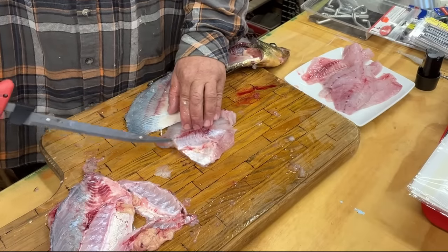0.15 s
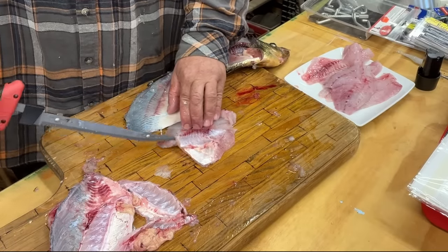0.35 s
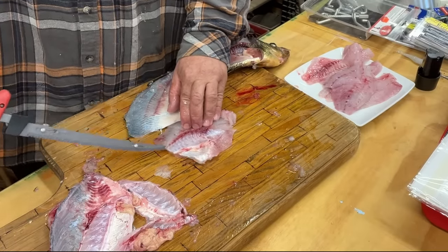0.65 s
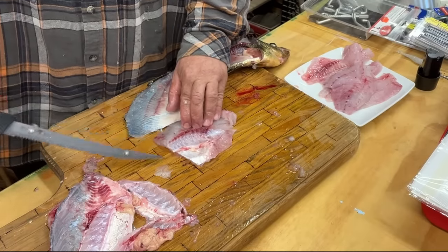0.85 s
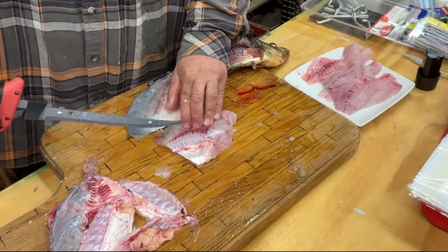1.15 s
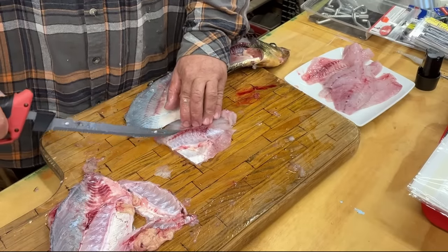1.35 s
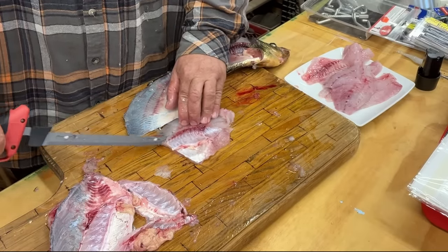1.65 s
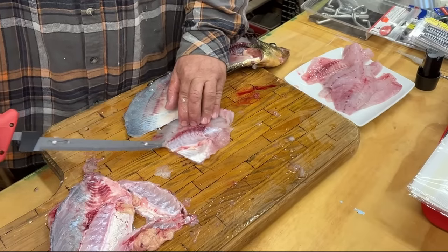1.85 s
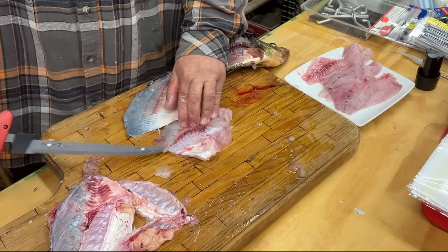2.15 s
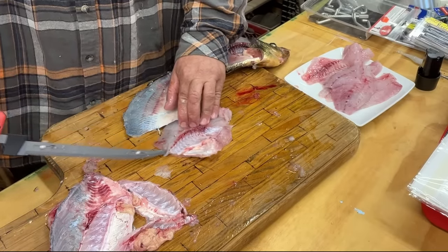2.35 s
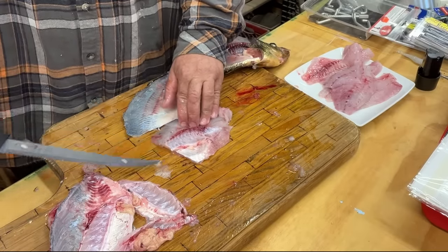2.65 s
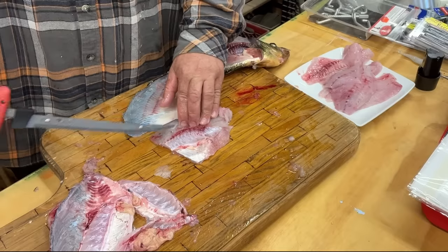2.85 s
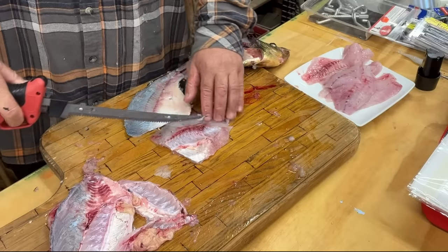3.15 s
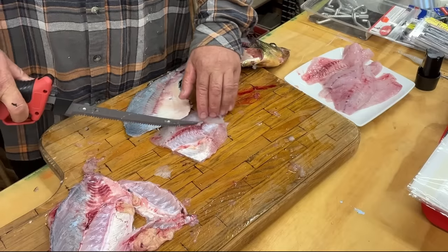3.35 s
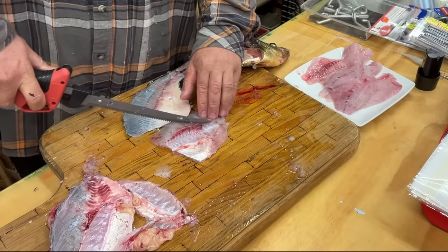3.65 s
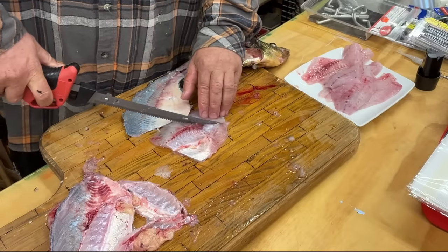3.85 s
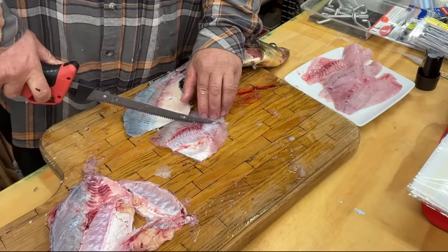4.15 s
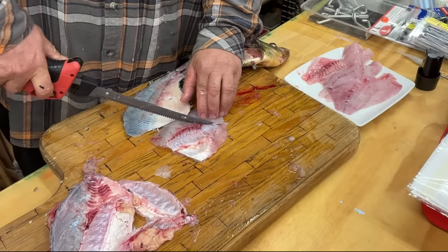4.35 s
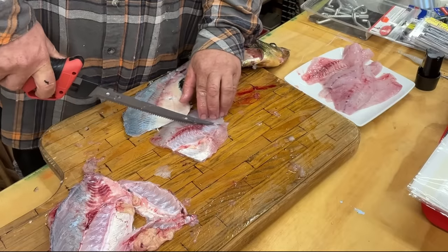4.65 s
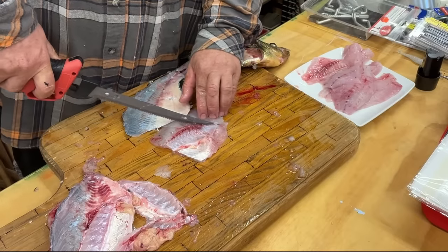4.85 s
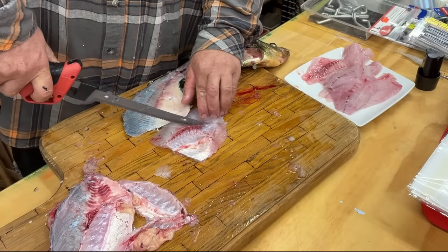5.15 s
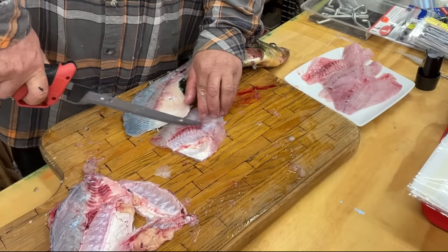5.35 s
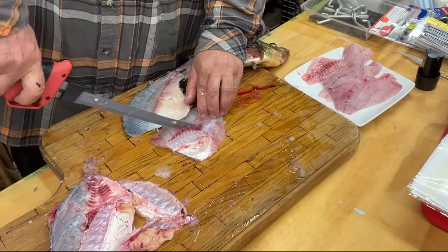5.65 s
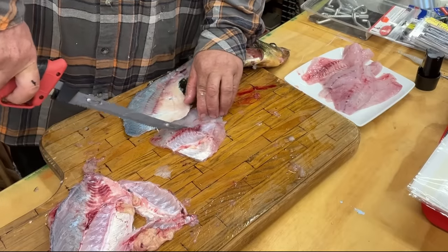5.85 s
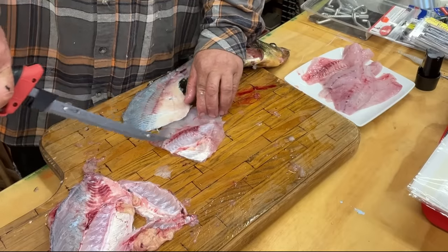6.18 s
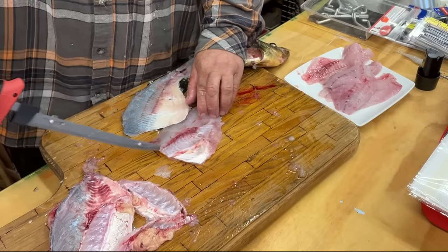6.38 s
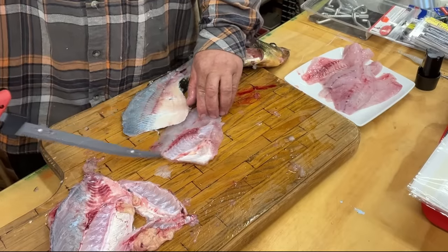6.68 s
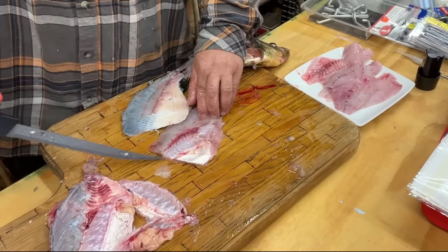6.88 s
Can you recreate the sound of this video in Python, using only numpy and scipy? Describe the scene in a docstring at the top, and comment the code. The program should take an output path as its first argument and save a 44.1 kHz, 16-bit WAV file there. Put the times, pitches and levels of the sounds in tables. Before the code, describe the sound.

An electric fillet knife buzzes and clacks in bursts while cutting fish on a board, with faint handling ticks in a pause.

```python
"""A quiet kitchen, where a cordless fillet knife runs in short bursts. A small motor drives gears and
a crank that saws two blades to and fro: the gears hiss and whine, the blades clack at each stroke end,
and the cutting board hums when they press on it. The trigger snaps and scuffs, the blades clack loosely
as the motor coasts down, and small ticks and dull bumps of handling fall on the board."""
import sys
import numpy as np
from scipy import signal
from scipy.fft import rfft, irfft, next_fast_len
from scipy.io import wavfile
from scipy.ndimage import uniform_filter1d, map_coordinates

SR = 44100
rng = np.random.default_rng(int(sys.argv[2]) if len(sys.argv) > 2 else 0)


def generate_wav(sig):
    """Save sig (samples, or channels by samples) to the path in sys.argv[1] as 16-bit PCM at SR."""
    pcm = np.round(np.clip(np.atleast_2d(sig).T, -1, 1) * 32767).astype(np.int16)
    wavfile.write(sys.argv[1], SR, pcm)


N = 309582
T = np.arange(N) / SR


def amp(db):
    """Gain of a level in dB."""
    return 10 ** (np.asarray(db) / 20)


def unit(x):
    """Scaled to rms 1."""
    return x / np.sqrt(np.mean(x ** 2) + 1e-20)


def along(points, hz):
    """Reads (Hz, value) points on a log axis."""
    f, v = np.transpose(points)
    return np.interp(np.log(hz + 1), np.log(f + 1), v)


def curves(rows):
    """One value per sample for each column after the time."""
    s, *cols = np.transpose(rows)
    return [np.interp(T, s, c) for c in cols]


def wobble(rate):
    """A smooth random curve, rate knots a second."""
    return map_coordinates(rng.standard_normal(int(N * rate / SR) + 4), [T * rate])


def filtered(x, response):
    """x through a complex frequency response."""
    m = next_fast_len(N + 8192)
    return irfft(rfft(x, m) * response(np.fft.rfftfreq(m, 1 / SR)), m)[..., :N]


def ringing(modes):
    """Frequency response of a table of resonances."""
    return lambda hz: sum((-1) ** k * amp(db) * 1j * hz * w / (c * c - hz * hz + 1j * hz * w)
                          for k, (c, w, db) in enumerate(modes))


def tone(cycles, waver_db, rate=12):
    """A sine on a running count of cycles, wavering in level and phase."""
    return np.sqrt(2) * amp(waver_db * wobble(rate)) * np.cos(2 * np.pi * (cycles + .045 * wobble(25)))


def clicks(rows, rise_cycles, crack):
    """Each contact is a short ring at its own pitch with a noisy crack."""
    out, t = np.zeros(N + SR), np.arange(SR // 10) / SR
    for start, db, hz in rows:
        age = t * hz / rise_cycles
        ring = age * np.exp(1 - age) * np.sin(2 * np.pi * hz * t)
        spit = crack * np.exp(-t / .0012) * np.diff(rng.standard_normal(len(t) + 1))
        out[round(start * SR):][:len(t)] += amp(db) * (ring + spit)
    return out[:N]


# Stereo image of the knife's noise. Each row: frequency in Hz, left-right likeness from -1 to 1.
KNIFE_IMAGE = [(100, 1), (250, 0.75), (500, 0.43), (1000, 0.99), (2500, 0.66), (5000, 0.042), (8000, 0.045),
               (12000, 0.92)]
def noise(spectrum, gate=1, image=KNIFE_IMAGE):
    """Gated, coloured stereo noise of rms 1, partly alike left and right."""
    angle = lambda hz: np.arccos(np.clip(along(image, hz), -1, 1)) / 2
    shape = lambda hz: amp(along(spectrum, hz)) * [np.cos(angle(hz)), np.sin(angle(hz))]
    mid, side = filtered(gate * rng.standard_normal((2, N)), shape)
    return unit(np.array([mid + side, mid - side]))


# Trigger pulls. Each row: pull and release in seconds, creep as a share of full speed, hiss in dB,
# clack in dB over the hiss, end-blow strength, whine harmonics 1, 2 and 3 in dB, coasting whine in dB.
PULLS = [(-.3, 0.02, .6, -33, -3.5, 6.7, -58, -43, -58, -53),
         (0.577, 0.898, 0.25, -36, -4.5, 4.9, -45, -41, -64, -57),
         (1.578, 2.588, 0.57, -34, -3, 5.9, -47, -44, -46.5, -50),
         (4.534, 4.606, 0.38, -43, -20, 2.8, -66, -66, -70, -68),
         (4.784, 7.31, 0.39, -34, -4, 3.47, -51, -63, -48, -68)]
# Full crank speed. Each row: time in seconds, turns per second.
CRANK_SPEED = [(0, 28), (.7, 28.4), (.83, 29), (.862, 28.7), (.895, 26.5), (1.7, 27.3), (1.9, 27.45),
               (2.35, 27.4), (2.6, 28), (4.6, 13), (4.8, 27.2), (5.2, 27.15), (5.6, 26.75), (5.95, 26.85),
               (6.25, 27.2), (6.5, 26.85), (6.7, 26.6), (6.8, 26.1), (6.9, 26.3), (7.02, 26.9)]
# Sync points, one per pull: a time in seconds when a stroke ends.
STROKE_ENDS = [.1648, 1.0535, 2.0095, 4.601, 5.495]
def motor(spin_up_s=.035, brake_hz_per_s=62, creep_s=.58):
    """Spins up, coasts, creeps to rest. Gives crank turns, speed in dB of full, power, pull number."""
    pulled, released, creep_share, *_ = np.transpose(PULLS)
    pull = np.searchsorted(pulled, T) - 1
    driven_until = np.minimum(T, released[pull])
    coast_s = T - driven_until
    full_hz = np.interp(driven_until, *np.transpose(CRANK_SPEED))
    spin = 1 - np.exp(-(driven_until - pulled[pull]) / spin_up_s)
    creep = (coast_s > 0) * creep_share[pull] * np.maximum(1 - coast_s / creep_s, 0)
    speed = np.maximum(spin - brake_hz_per_s * coast_s / full_hz, creep) + .001006
    turns = np.cumsum(speed * full_hz) / SR
    turns -= np.interp(STROKE_ENDS, T, turns)[pull]
    on = 1. * (coast_s == 0)
    power = np.maximum(uniform_filter1d(on, size=200), signal.lfilter([.0005], [1, -.9995], on))
    return turns, 20 * np.log10(speed), power, pull


# Load on the blades. Each row: time in seconds, board hum in dB (it stands for pressure), fourth crank
# harmonic in dB over the hum, gear noise trim in dB, board buzz trim in dB.
LOAD = [(0, -68, -6, -5.5, 0), (0.689, -61, 13.5, 2, -6), (.9, -72, 8, 0, 1), (1.7, -61, 9, 0.5, -4),
        (1.9, -51.5, 0, 1, 5), (2.43, -52, 1.5, 1, 3.5), (2.46, -49.5, 4, 1.5, 9),
        (2.529, -33, -13, -0.5, 2.5), (2.7, -43.5, 8, -2, -0.5), (4.8, -68, 0.5, -2, -7),
        (5.0, -46.5, 3.5, -1.5, 1.5), (5.06, -33.5, -41, 0, 1.5), (5.299, -30, -15.5, 0.5, -4.5),
        (5.65, -29, -1, 0, -2.5), (5.95, -36, 1.5, 0.5, 3), (6.12, -32.5, 2, 1.5, 2),
        (6.3, -37, -7, 0.5, 6.5), (6.45, -38, -10, 2, 0), (6.66, -49.5, -18, 3.5, 5),
        (6.76, -43, 6.5, 2, 4), (6.879, -38.5, -16.5, 0.5, 3.5), (7.02, -28.5, 1.5, 1, 1)]
def gear_level(speed_db, pull):
    """The fader for gear noise, in dB: it follows speed, more steeply in a coast."""
    _, released, _, hiss_db, *_ = np.transpose(PULLS)
    slope = np.where(T > released[pull], 1.57, 1)
    return hiss_db[pull] + curves(LOAD)[2] + slope * speed_db


# Bright gear hiss. Each row: frequency in Hz, relative level in dB.
HISS_EQ = [(1060, -20.5), (1800, -8.5), (2170, -2), (2680, -3.5), (3200, -3.5), (5030, -2.5), (6530, -4),
           (7210, -9.5), (8320, -7), (10300, -21), (13200, -25), (13900, -11), (15500, -37)]
# Shell resonances. Each row: centre in Hz, width in Hz, dB over the hiss under power, the same coasting.
SHELL_MODES = [(805, 28, -12.5, -10.5), (1183, 56, -16, -20), (4005, 136, -16.5, -13),
               (4400, 110, -16.5, -8.5), (8390, 220, -13, -16.5)]
# How freely the grip lets the shell ring under power: one trim in dB per pull.
SHELL_TRIM = [9.5, 3, 0, 0, 0]
def gear_hiss(reversal, power, pull):
    """Teeth meet unevenly: a grainy hiss that rings the shell."""
    hiss = noise(HISS_EQ, amp(2.5 * wobble(900)) * (1 + .23 * reversal))
    for hz, width, driven_db, coast_db in SHELL_MODES:
        level_db = (driven_db + np.take(SHELL_TRIM, pull)) * power + coast_db * (1 - power)
        hiss += amp(level_db) * noise([(hz - 3 * width, -30), (hz, 0), (hz + 3 * width, -30)])
    return hiss


# Rattling blade holder and whirring handle. Each row: centre in Hz, width in Hz, relative level in dB.
HOLDER_MODES = [(1100, 45, 3.5), (3015, 110, 1.5), (4300, 130, -7.5), (6840, 500, -5)]
HANDLE_MODES = [(773, 55, -1), (937, 64, -7), (1390, 130, -2)]
# The grip. Each row: time in seconds, rattle and whirr in dB over the hiss, board's eighth harmonic in dB.
GRIP = [(0, -12, -25, -68), (2.42, -28, -22.5, -75), (2.47, -22, -13, -32.5), (2.58, -20, -23, -38),
        (2.65, -19, -26, -54), (4.78, -20, -17, -68), (4.81, -1.5, -24, -67), (5.0, -4.5, -22, -44.5),
        (5.3, -4, -13, -37), (5.8, -23, -9, -44), (6.15, -27, -21, -39), (6.28, -16, -11, -35),
        (6.4, -14, -10.5, -40), (6.65, -21, -8, -58), (6.73, -21, -4.5, -38), (6.85, -20, -7.5, -46),
        (7.02, -20, -5.5, -38)]
def rattle_and_whirr(shake):
    """Each reversal shakes the blade holder and the handle."""
    def shaken(modes, width):
        jitter = rng.standard_normal(N) + width * rng.standard_normal((2, N))
        return unit(filtered(shake * jitter, ringing(modes)))
    rattle_db, whirr_db, _ = curves(GRIP)
    return amp(rattle_db) * shaken(HOLDER_MODES, .8) + amp(whirr_db) * shaken(HANDLE_MODES, .7)


# Clack colour, blades free and pressed. Each row: frequency in Hz, relative level in dB.
FREE_EQ = [(2500, -46), (3500, 4), (4500, -11), (5200, 0.5), (6000, -1), (8500, -10.5), (15000, -25)]
PRESSED_EQ = [(1000, -15.5), (2800, 8.5), (4500, 2), (6500, 10.5), (8500, 1.5), (11000, -8.5),
              (15000, -3.5)]
# Ring of struck steel. Each row: centre in Hz, width in Hz, relative level in dB.
STEEL_MODES = [(2830, 200, -16), (3700, 260, 3.5), (4690, 197, 2.5), (5150, 210, 5), (6430, 470, 1),
               (7400, 130, 1.5)]
def blade_clack(turns, stroke, reversal, pressed, pull):
    """At each reversal: a noise burst, with small taps and one hard blow that ring the steel."""
    taps = reversal * (rng.random(N) < .04) * 3.5 * rng.standard_normal(N)
    at_end = np.diff(np.floor(2 * turns), prepend=0) != 0
    taps += np.transpose(PULLS)[5, pull] * reversal * at_end
    clack = np.sqrt(1 - pressed) * noise(FREE_EQ, reversal)
    clack += np.sqrt(pressed) * noise(PRESSED_EQ, reversal)
    clack += 1.7 * unit(filtered(taps, lambda hz: ringing(STEEL_MODES)(hz) * hz / (hz + 3000)))
    # the crank drives every stroke alike, so even out most of the chance in their energy
    which = np.cumsum(np.diff(stroke, prepend=0) != 0)
    energy = np.bincount(which, np.mean(clack ** 2, axis=0))
    excess = energy / (np.bincount(which, reversal ** 2) + 1e-9) + 1e-9
    return unit(clack / excess[which] ** .47)


# Low body of the motor. Each row: frequency in Hz, relative level in dB.
DRONE_EQ = [(35, -25), (60, -9.5), (150, -3.5), (195, -18.5), (290, -5.5), (430, -9), (700, -6.5),
            (1150, -4.5), (1580, -4), (1850, -12), (2600, -40.5)]
# Rotor tone: one level per pull, in dB over the drone.
ROTOR_LEVELS = [-14, -29, -8.5, -10, -11.5]
# Motor tones under load. Each row: crank harmonic, level in dB over the drone.
STRAIN_TONES = [(40, -10), (42, -9)]
def motor_drone(turns, speed_db, power, pull, reversal, pressed):
    """A rumble with a rotor tone, strain under lasting load, and small knocks that repeat every turn."""
    drone = noise(DRONE_EQ, 1 + .5 * reversal)
    drone += power * amp(ROTOR_LEVELS)[pull] * tone(19.3 * turns, 3)
    strain = uniform_filter1d(pressed, size=SR // 2) ** 2
    drone += strain * sum(amp(db) * tone(k * turns, 3.5, rate=7) for k, db in STRAIN_TONES)
    knocks = lambda first: sum(tone(k * turns + rng.random(), 6, rate=5) for k in range(first, 50, 2))
    comb = unit(knocks(15) + knocks(16) + .65 * knocks(16) * [[1], [-1]])
    return drone + power * amp(-4 + 20 * speed_db) * comb  # the comb sounds only near full speed


def gear_whine(turns, speed_db, power, pull, teeth_per_turn=100):
    """Meshing teeth sing three harmonics; in a coast the second swells through a shell resonance."""
    *driven_db, coast_db = np.transpose(PULLS)[6:, pull]
    first, second, third = amp(np.array(driven_db) + 5.7 * speed_db)
    coast_db -= 6 * ((speed_db + 2.2) / 1.6) ** 2  # loudest 2.2 dB below full speed
    second = power ** 4 * second + (1 - power ** 4) * amp(coast_db)
    mesh = teeth_per_turn * turns + np.cumsum(30 * wobble(90)) / SR
    return (first * tone(mesh, 4.7, rate=45) + second * tone(2 * mesh, 4.1, rate=45)
            + third * tone(3 * mesh, 2.6))


def drivetrain(turns, speed_db, power, pull):
    """The knife's running mix, pulsing twice a turn as the blades reverse and load the gears."""
    pressed = np.clip((curves(LOAD)[0] + 52) / 16, 0, 1) * power
    stroke, phase = np.divmod(2 * turns + .5, 1)
    play_db = 1.2 * rng.standard_normal(400)
    play_db[::2] += 1.5  # one end of the stroke has more play
    size = amp(play_db[stroke.astype(int) % 400])
    pulse = lambda width: size * np.exp(-((phase - .5) / width) ** 2)
    reversal = pulse(.11)
    clack = blade_clack(turns, stroke, reversal, pressed, pull)
    hiss = gear_hiss(reversal, power, pull) + rattle_and_whirr(pulse(.19) + .096)
    drone = motor_drone(turns, speed_db, power, pull, reversal, pressed)
    clack_db = np.transpose(PULLS)[4, pull] + speed_db
    drone_db = -6.5 + 2 * pressed - .16 * speed_db  # lingers as the motor slows
    body = hiss + amp(clack_db) * clack + amp(drone_db) * drone
    return amp(gear_level(speed_db, pull)) * body + gear_whine(turns, speed_db, power, pull)


# Overtones as the blades lean in. Each row: time in seconds, then levels in dB of crank harmonics
# 3 and 5 (shared), 10, 13 and 32.
LEAN_TONES = [(2.42, -64, -58, -55, -70), (2.53, -45.5, -41.5, -44, -60), (5.0, -63, -60.5, -60, -65),
              (5.2, -57, -36, -36, -37.5), (5.42, -58, -40, -35, -44), (5.65, -57, -37, -37.5, -59),
              (5.82, -48, -44.5, -40, -61), (6.1, -42, -54, -42, -41.5), (6.33, -38.5, -55, -55, -53),
              (6.55, -55, -57, -38.5, -62), (7.02, -50, -54, -47, -56)]
# The board's buzz. Each row: crank harmonic, relative level in dB.
BUZZ_TONES = [(11, 1), (12, 3), (14, 2.5)]
def board_hum(turns, power):
    """The pressed blades shake the board at harmonics of the crank, over a low scrub."""
    hum_db, fourth_db, _, trim_db = curves(LOAD)
    sixth_db = -32 + .88 * (hum_db + 29)
    evens = [(2, hum_db), (4, hum_db + fourth_db), (6, sixth_db)]
    hum = sum(amp(db) * tone(k * turns, .7) for k, db in evens)
    hum += amp(curves(GRIP)[2]) * tone(8 * turns, 2)
    low_db, *upper_db = curves(LEAN_TONES)
    overtones = zip([3, 5, 10, 13, 32], [low_db, low_db, *upper_db])
    hum += sum(amp(db) * tone(k * (turns - .38) + .5, 1.2) for k, db in overtones)
    buzz = unit(sum(amp(db) * tone(k * (turns - .3) + .5, 2, rate=6) for k, db in BUZZ_TONES))
    scrub = noise([(40, -10), (90, -7), (250, 5.5), (420, -7), (700, -24.5)], amp(1.3 * wobble(45)))
    buzz_db = -39.5 + trim_db + .67 * (hum_db + 29.5)
    return power * (hum + amp(buzz_db) * (buzz + amp(2) * scrub))


# Room tone. Each row: frequency in Hz, relative level in dB.
KITCHEN_EQ = [(15, -33), (25, -3), (68, 0), (433, -25), (648, -21), (1340, -27), (1900, -26), (2490, -36),
              (5010, -37), (5430, -29), (7500, -41), (13900, -46), (15500, -61)]
# Its stereo image. Each row: frequency in Hz, left-right likeness from -1 to 1.
KITCHEN_IMAGE = [(60, -0.18), (240, -0.34), (950, -0.3), (3770, 0.86), (15000, -1)]
def kitchen(level_db=-61):
    """A steady bed of room hush, slightly uneven."""
    return amp(level_db) * noise(KITCHEN_EQ, amp(wobble(10)), KITCHEN_IMAGE)


# The hardest loose clacks. Each row: start in seconds, level in dB, pitch in Hz.
LOOSE_CLACKS = [(0.0618, -25, 4760), (0.0817, -31, 4590), (0.1341, -38, 5150), (0.2783, -50, 4400),
                (0.109, -32, 4990), (0.196, -42.5, 5400), (0.2359, -39, 4840), (0.1648, -28, 5340),
                (0.3474, -47, 5260), (0.9287, -38, 6420), (0.9856, -25.5, 4500), (2.6651, -25, 4760),
                (2.6984, -28, 3658), (2.7703, -32, 5430), (2.8, -33, 4500), (1.0535, -31, 5000),
                (1.1263, -35.5, 4500), (1.1712, -40, 4370), (2.8875, -30.5, 5250), (2.9612, -40.5, 5200)]
def slack_blades(turns, speed_db, power, pull, pitch_hz=4600):
    """Slack blades clack at the stroke ends of a coast, with placed accents on top."""
    at_end = np.diff(np.floor(2 * turns)) == 1
    ends = np.flatnonzero(at_end & (power[1:] < .5) & (speed_db[1:] > -20))
    chance = rng.standard_normal((60, 2))
    level_db = gear_level(speed_db, pull)[ends] - 8
    rows = [(i / SR, db + 2.5 * force, pitch_hz * np.exp(.17 * detune))
            for i, db, (force, detune) in zip(ends, level_db, chance)]
    return clicks(LOOSE_CLACKS + rows, rise_cycles=1.74, crack=.35)


# Clear handling ticks. Each row: start in seconds, level in dB, pitch in Hz.
HANDLING_TICKS = [(3.1353, -48, 5400), (3.3049, -49, 5500), (3.3687, -47.5, 5600), (3.6516, -52, 7360),
                  (3.8731, -51, 5450), (4.0791, -48, 6430), (4.1023, -57, 7040), (4.362, -44.5, 5800),
                  (4.4278, -52, 6540)]
def handling(faint_db=-65, top_hz=5760):
    """Hands and knife tick on the wet board: a few clear ticks, and faint ones scattered throughout."""
    faint = [(when * N / SR, faint_db + 8 * (force - .5), top_hz * np.exp(-detune ** 2))
             for when, force, detune in rng.random((30, 3))]
    return clicks(HANDLING_TICKS + faint, rise_cycles=.85, crack=.12)


# Trigger snaps. Each row: start in seconds, level in dB, pitch in Hz.
SNAPS = [(0.5803, -12.5, 3740), (1.5899, -7.5, 3940), (4.5393, -31, 5300), (4.557, -24, 4400),
         (4.672, -24.5, 4950)]
def trigger_snaps():
    """The trigger snaps with a tight, bright click."""
    return clicks(SNAPS, rise_cycles=.42, crack=.13)


# Start-up groans. Each row: start in seconds, level in dB.
START_GROANS = [(.608, -37.5), (1.625, -39), (4.553, -52), (4.822, -39)]
def motor_groans(low_hz=420, rise_hz=200, length_s=.043):
    """The motor groans briefly upward as it starts."""
    out, t = np.zeros(N), np.arange(round(length_s * SR)) / SR
    glide = np.sin(2 * np.pi * (low_hz * t + rise_hz * t * t / length_s / 2))
    for start, db in START_GROANS:
        out[round(start * SR):][:len(t)] += amp(db) * np.hanning(len(t)) * glide
    return out


# Bumps on the board. Each row: start in seconds, level in dB, pitch in Hz.
BOARD_BUMPS = [(.84, -32.5, 121), (3.163, -50, 48), (3.184, -55, 48), (6.336, -26.5, 155)]
def board_bumps():
    """The bumped board gives a dull, low thud."""
    return clicks(BOARD_BUMPS, rise_cycles=.6, crack=0)


# Trigger scuffs. Each row: start in seconds, level in dB before the trim, centre in Hz, fade in seconds.
TRIGGER_SCUFFS = [(4.54, -28.5, 5030, 0.0037), (4.555, -28, 1070, 0.0039), (4.601, -29.5, 10800, 0.011),
                  (4.672, -34, 5730, 0.0041), (4.771, -52, 5160, 0.0039), (4.789, -40, 8150, 0.0034),
                  (4.796, -35, 1160, 0.03)]
def trigger_scuffs(trim_db=-10):
    """Plastic rubs on plastic as the trigger is half pressed and let go: short puffs of noise."""
    out, t = np.zeros(N + SR), np.arange(SR // 10) / SR
    for start, db, hz, fade_s in TRIGGER_SCUFFS:
        puff = unit(signal.lfilter(*signal.iirpeak(hz, 2.5, SR), rng.standard_normal(len(t))))
        out[round(start * SR):][:len(t)] += amp(db + trim_db) * np.exp(-t / fade_s) * puff
    return out[:N]


# Reverb return. Each row: frequency in Hz, level in dB over the direct sound.
REVERB_EQ = [(60, -28), (200, -45.5), (500, 12), (4000, -0.5), (12000, -4.5)]
def room(x, decay_s=.15):
    """Table and walls scatter sharp sounds, differently to each side."""
    t = np.arange(SR // 4) / SR
    tail = rng.standard_normal((2, len(t))) * amp(-60 * t / decay_s) * (t > .002)
    wet = signal.fftconvolve(x[None], tail / np.linalg.norm(tail[0]), axes=1)[:, :N]
    return filtered(wet, lambda hz: amp(along(REVERB_EQ, hz)))


# The knife's place in the image. Each row: frequency in Hz, phase lead of the left side in radians.
LEFT_LEAD = [(0, -0.5), (430, 1.76), (1210, 1), (2070, 2.5), (2840, 4.5), (3450, 4), (5510, 7.5),
             (7060, 9.5), (8270, 7.5), (8870, 14.5), (10300, 8), (12800, 3.5), (13900, 24.5), (15300, -5.5)]
# Shading by the camera body. Each row: frequency in Hz, left minus right in dB.
LEFT_TILT = [(60, -0.5), (200, -1.5), (380, 3), (700, 10.5), (1290, 1.5), (2380, 1), (4400, -4), (8120, 4),
             (15000, -2)]
def scene():
    """The knife reaches the left microphone first; the camera body shades each side in its own way."""
    drive = motor()
    turns, _, power, _ = drive
    contacts = trigger_snaps() + trigger_scuffs() + slack_blades(*drive) + handling() + board_bumps()
    knife = drivetrain(*drive) + board_hum(turns, power) + motor_groans() + contacts
    side = np.array([[.5], [-.5]])
    direct = filtered(knife, lambda hz: np.exp(1j * side * np.interp(hz, *np.transpose(LEFT_LEAD))))
    shaded = filtered(direct + room(contacts), lambda hz: amp(side * along(LEFT_TILT, hz)))
    return shaded + kitchen()


def record(dry):
    """The camera rolls off the top and keeps nothing above its band limit."""
    top_hz, rolloff = 15725, [(13800, -.5), (14400, -26)]
    return filtered(dry, lambda hz: (hz < top_hz) * amp(along(rolloff, hz)))


dry = scene()
out = record(dry)
generate_wav(out)
```